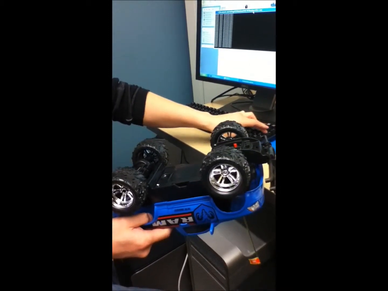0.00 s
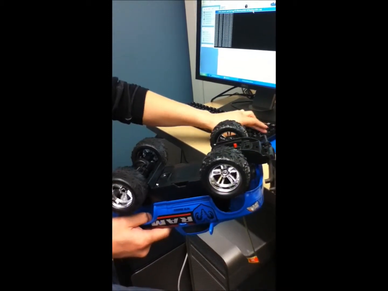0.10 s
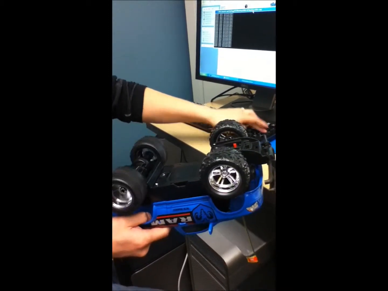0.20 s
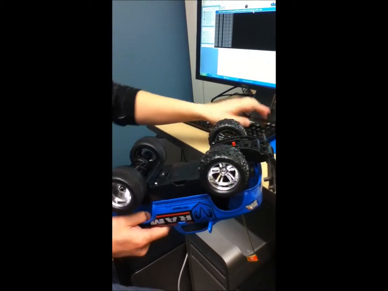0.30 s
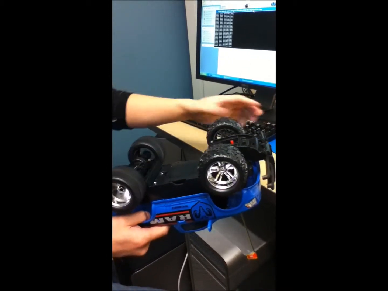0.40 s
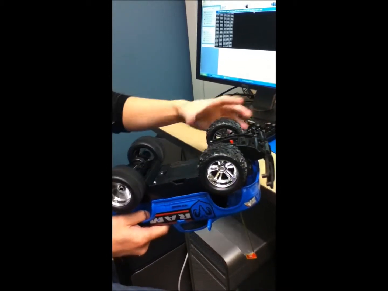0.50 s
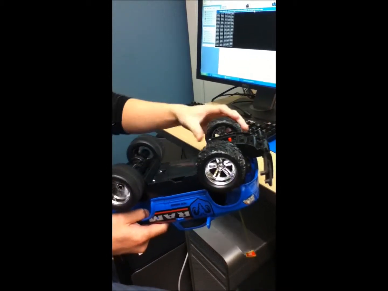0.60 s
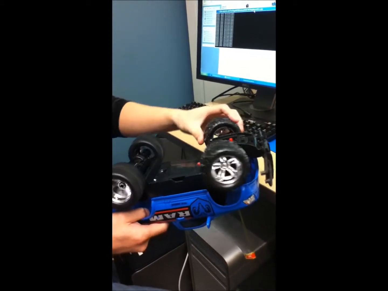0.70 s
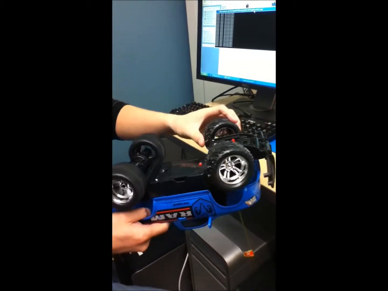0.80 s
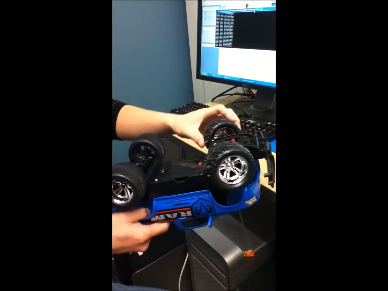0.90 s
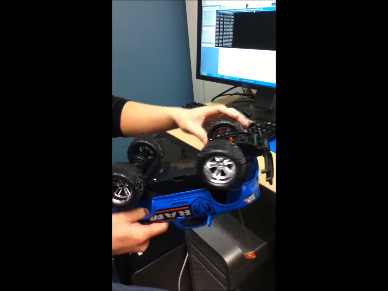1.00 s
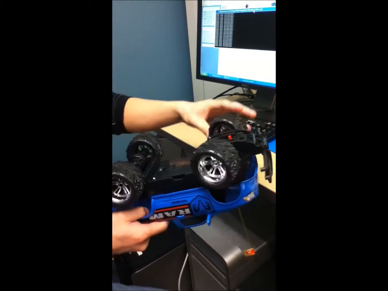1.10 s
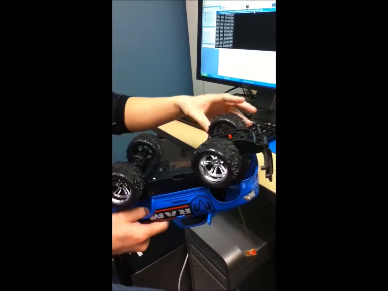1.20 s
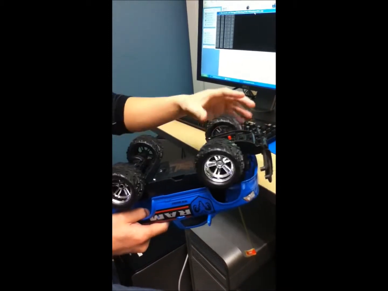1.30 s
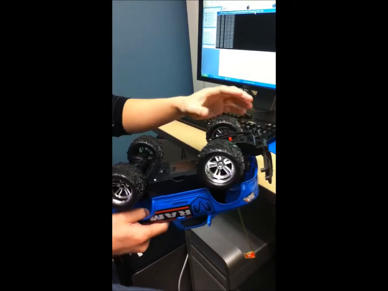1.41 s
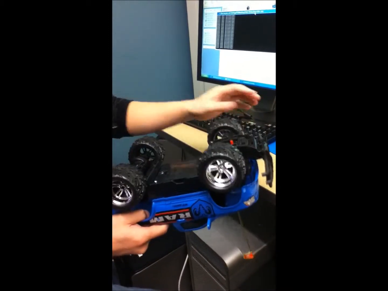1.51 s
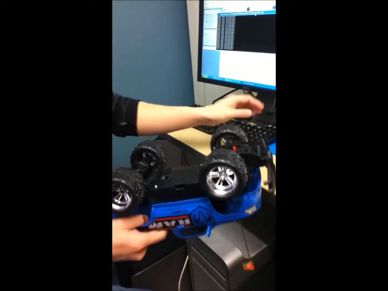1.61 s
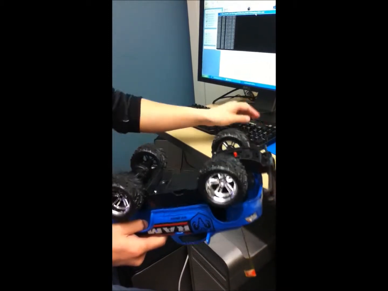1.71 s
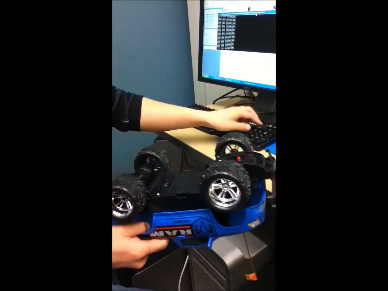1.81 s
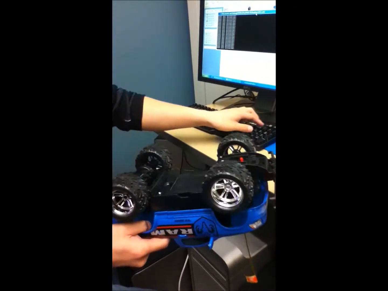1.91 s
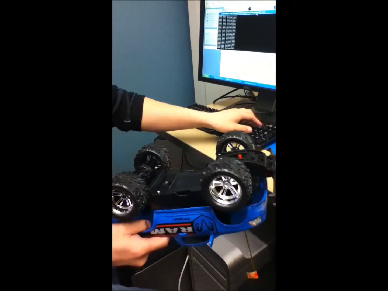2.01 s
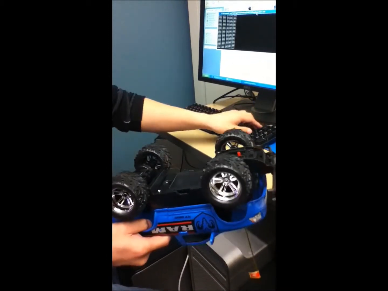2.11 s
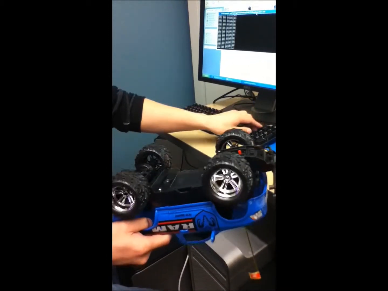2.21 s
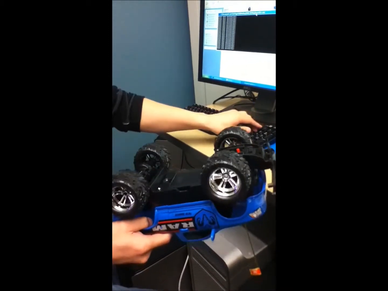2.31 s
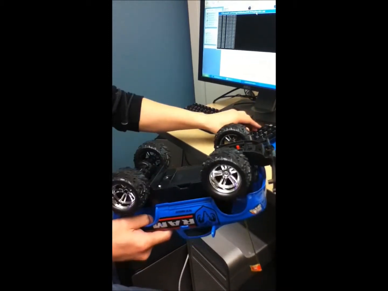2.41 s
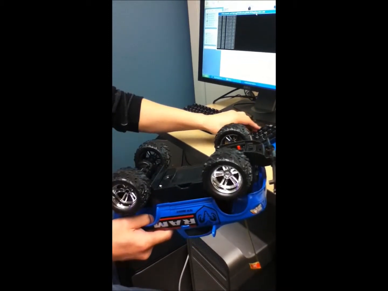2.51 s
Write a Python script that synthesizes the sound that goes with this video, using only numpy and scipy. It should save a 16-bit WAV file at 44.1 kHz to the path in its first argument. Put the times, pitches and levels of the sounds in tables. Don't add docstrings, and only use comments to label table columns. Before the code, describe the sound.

Plastic gears of a hand-flicked toy truck wheel rattle in a fast, bright ratcheting burst, slow to separate ticks, then the axle knocks; a pause and one short click follow, close up in a quiet humming office.

```python
import sys
import numpy as np
from scipy import signal
from scipy.fft import rfft, irfft
from scipy.io import wavfile
from scipy.ndimage import map_coordinates

SR = 44100
rng = np.random.default_rng(int(sys.argv[2]) if len(sys.argv) > 2 else 0)


def makeup_ratio(level_db):
    decades = np.asarray(level_db, float) / 20
    return 10 ** decades


def file_out(sig):
    cols = np.atleast_2d(sig).T
    lim = np.clip(cols, -1, 1)
    pcm = np.round(lim * 32767).astype(np.int16)
    wavfile.write(sys.argv[1], SR, pcm)


N = 114660

PIVOT_HZ = 3324
EDGE_HZ = 1990


def level(x, db=0):
    return x * makeup_ratio(db) / np.sqrt(np.mean(x ** 2))


def ring(x, hz, width):
    return signal.lfilter(*signal.iirpeak(hz, hz / width, fs=SR), x)


def colour(x, points):
    hz, db = np.array(points).T
    f = np.fft.rfftfreq(8192, 1 / SR) + 1
    log_gain = np.interp(np.log(f), np.log(hz), db) * np.log(10) / 20
    cepstrum = irfft(log_gain)
    cepstrum[1:4096] *= 2
    cepstrum[4097:] = 0
    impulse = irfft(np.exp(rfft(cepstrum)))
    return signal.fftconvolve(x, impulse)[:len(x)]


def walk(rate):
    at = np.arange(N) * rate / SR
    return 0.77 * map_coordinates(rng.standard_normal(2000), [at], order=1)


def tilt(bright_db, hz):
    return makeup_ratio(bright_db * np.log2(max(hz, EDGE_HZ) / PIVOT_HZ))


def office():
    # (frequency [Hz], density [dB per Hz])
    rumble = [(12, -25.5), (20, -7), (38, -3), (55, -13.5), (113, -7), (146, -24.5), (210, -13), (558, -35),
              (16000, -46.5)]
    # (frequency [Hz], width [Hz], level [dB])
    fan = [(25.2, 5.5, -41), (109.3, 21, -53), (196, 36, -58), (365, 57, -56.5)]
    # (frequency [Hz], width [Hz], level [dB])
    hiss = (4200, 2500, -62.5)
    out = level(colour(rng.standard_normal(N), rumble), -42)
    for hz, width, db in [*fan, hiss]:
        out = out + level(ring(rng.standard_normal(N), hz, width), db)
    return out


def room(x):
    t60_s, tail_db, dull_hz = 0.22, -16, 5000
    t = np.arange(SR // 2) / SR
    tail = rng.standard_normal(len(t)) * makeup_ratio(-60 * t / t60_s) * (t > .003)
    tail = signal.lfilter(*signal.butter(1, dull_hz, fs=SR), tail)
    return signal.fftconvolve(x, tail * makeup_ratio(tail_db) / np.sqrt(np.sum(tail ** 2)))[:N]


def ticks():
    teeth_per_s, scatter_db, biggest_db, grit_db = 2500, 3.0, 11, -2.5
    gaps, sizes = rng.random((2, 20000))
    at = (np.cumsum(.5 + gaps) * SR / teeth_per_s).astype(int)
    x = np.zeros(at[-1] + N)
    x[at] = makeup_ratio(np.minimum(-scatter_db * np.log(sizes), biggest_db))
    x = x[:N] - x[:N].mean()
    return level(x) + level(rng.standard_normal(N), grit_db)


def body(drive, push, modes, shell_db, wander_db):
    # (frequency [Hz], density [dB per Hz])
    shell_spectrum = [(290, -71.5), (500, -39), (678, -10.5), (1570, -4), (1790, 3), (2500, -5), (3750, 0),
                      (11600, -15.5), (16000, -15.5)]
    wander_per_s, top_hz = 35, 12900
    norm = np.sqrt(sum(makeup_ratio(db) ** 2 * width * np.pi / SR for _, width, db in modes))
    out = np.zeros(N)
    for k, (hz, width, db) in enumerate(modes):
        force = drive * push(hz) * makeup_ratio(wander_db * walk(wander_per_s))
        out += (-1) ** k * makeup_ratio(db) / norm * ring(force, hz, width)

    shell = level(colour(drive, shell_spectrum), shell_db)
    low = signal.lfilter(*signal.butter(1, PIVOT_HZ, fs=SR), shell)
    wide = signal.lfilter(*signal.butter(1, PIVOT_HZ * 2.4, fs=SR), shell)
    out += low * push(PIVOT_HZ / 2)
    out += (wide - low) * push(PIVOT_HZ * 0.91)
    out += (shell - wide) * push(PIVOT_HZ * 3.3)
    return signal.sosfilt(signal.butter(4, top_hz, fs=SR, output="sos"), out)


def axle(t):
    # (start [s], level [dB], brightness [dB per octave], decay [s])
    knocks = [(1.095, -30, -1.5, 0.0032), (1.107, -36, -1, .002), (1.114, -50, -10, 0.0066),
              (1.13, -45, -9, 0.0023), (1.140, -35, -6, 0.0023), (1.147, -41, -10, 0.0042),
              (1.154, -23, 2.5, 0.0011), (1.158, -27, -3.5, 0.0033), (1.167, -39.5, -6.5, 0.0054),
              (1.173, -48, 0, 0.0018), (1.195, -45, 1, 0.0016), (1.199, -39.5, -4.5, 0.0048),
              (1.277, -54, -10, 0.012), (1.333, -40, -5.5, 0.006), (1.344, -37, -1.5, 0.0045),
              (1.373, -42, -2, 0.0017), (1.378, -44, -6, 0.0096), (1.402, -48.5, -5, 0.0036),
              (2.328, -38.5, -8.5, 0.013), (2.371, -49, -9, .03)]
    # (frequency [Hz], width [Hz], level [dB])
    axle_modes = [(820, 280, -3), (1370, 160, 1.5), (1900, 120, -3.5), (2230, 194, -1.5), (3000, 285, -15),
                  (4480, 580, -4.5), (7110, 860, -6), (10600, 3200, -14.5)]
    start, db, bright, decay = np.array(knocks).T
    since = t - start[:, None]
    shape = (since > 0) * np.exp(-np.maximum(since, 0) / decay[:, None])

    def push(hz):
        return 1.35 * makeup_ratio(db) * tilt(bright, hz) @ shape

    return body(ticks(), push, axle_modes, shell_db=-7, wander_db=2.4)


def sings(t):
    # (centre [s], length [s], frequency [Hz], level [dB])
    tones = [(0.246, .045, 1690, -24.5), (0.293, 0.019, 2880, -11), (0.3, 0.038, 2190, -19),
             (0.323, 0.03, 1690, -17), (0.338, 0.015, 3680, -13), (0.347, 0.039, 1830, -15),
             (0.37, 0.018, 2900, -13.5), (0.379, 0.022, 3820, -16), (.410, 0.015, 2150, -17.5),
             (.374, .018, 11870, -26), (0.442, 0.03, 2270, -18), (0.586, 0.018, 2200, -18.5),
             (0.616, 0.023, 2950, -20.5), (.660, 0.059, 1850, -27), (0.708, .03, 1670, -26),
             (0.803, .016, 2240, -25.5)]
    wobble, flutter_db = 0.0053, 3
    centre, length, hz, db = np.array(tones).T[:, :, None]
    swell = np.cos(np.pi * np.clip((t - centre) / length / 1.27, -.5, .5)) ** 2
    clock = np.cumsum(1 + wobble * walk(150.2)) / SR
    waves = np.sin(2 * np.pi * (hz * clock + rng.random((len(hz), 1))))
    return np.sqrt(2) * (makeup_ratio(db) * swell * waves).sum(axis=0) * makeup_ratio(flutter_db * walk(400))


def gears(t):
    # (time [s], level [dB], brightness [dB per octave])
    spin = [(.205, -40, 1.5), (.225, -26.5, -3), (.26, -17.5, -3), (.32, -21, 2.5), (.45, -20, 0.5),
            (.53, -27.5, 2), (.7, -28.5, -3), (.9, -30, -2), (1.0, -47, 0.5), (1.12, -56.5, -6.5),
            (1.24, -63, -1)]
    # (start [s], length [s], level [dB], brightness [dB
    # per octave], favoured frequency [Hz])
    binds = [(0.217, 0.0081, -25, -9, 3800), (0.248, 0.012, -21.5, -2.5, 1720),
             (0.27, 0.014, -21.5, -7, 6400), (.283, 0.02, -13.5, 0, 2870),
             (0.309, 0.023, -18.5, -0.5, 1750), (0.329, 0.02, -14, -1.5, 3970),
             (0.362, 0.018, -11, 0, 4100), (0.396, 0.018, -12, 0, 3800), (0.429, .016, -13.5, 1.5, 2230),
             (0.467, .012, -12, 0, 4200), (0.502, .011, -13.5, 1, 3860), (0.535, 0.012, -14.5, 0.5, 4200),
             (0.556, 0.01, -15.5, 0, 3130), (0.576, 0.014, -17.5, -1.5, 2230),
             (0.594, 0.016, -18.5, 2, 3130), (0.612, 0.012, -19.5, 0.5, 3000),
             (0.637, 0.025, -21, 0.5, 1850), (0.664, 0.0042, -17, 0.5, 1850), (0.678, 0.031, -22, 2, 1700),
             (0.719, 0.011, -23, -1, 2250), (0.74, 0.0053, -20.5, 0.5, 3000),
             (0.753, 0.0057, -18.5, 1, 4750), (0.794, 0.0035, -17.5, 1, 2240), (0.805, 0.013, -27, 0, 3000),
             (0.834, 0.027, -27, -1, 2400), (0.864, 0.0071, -22, 0, 2400), (0.876, 0.01, -29, -1, 2300),
             (0.922, .011, -26.5, -2.5, 1900), (.939, 0.0085, -29, -2.5, 3000),
             (0.964, 0.002, -25.5, -1, 2300),
             (0.191, 0.0036, -24.5, -2, 4890), (1, 0.0049, -30, -2, 2260), (1.02, 0.00292, -39, -4.5, 3000),
             (1.037, .005, -35, -5.5, 1900), (1.063, .006, -38.5, -5.5, 2800),
             (1.074, 0.00325, -38.5, -6, 2900), (2.307, 0.0063, -19, 0, 4940),
             (2.326, 0.0027, -26.5, 2, 2250), (2.344, 0.0046, -25.5, -0.5, 3560),
             (2.364, .001, -23, -1.5, 1850), (2.316, 0.054, -37.5, -2.5, 2260),
             (2.374, 0.023, -55, 3, 2180), (2.424, 0.025, -54, -7, 2260)]
    # (frequency [Hz], width [Hz], level [dB])
    chassis = [(722, 167, -14.5), (1201, 68, -11), (1757, 64, -1.5), (1850, 46.6, 0.5), (2230, 126, -5.5),
               (2870, 376, -1.5), (3870, 93, -9), (4200, 294, -1.5), (4750, 310, -11), (5164, 203, -4),
               (6237, 530, -10), (7660, 167, -7), (9040, 1500, -20.5), (12370, 400, -16.5)]
    rise_s, rise_share, fall_s = 0.002, 0.31, 0.0026
    favour_db, favour_oct = 4, 0.12
    rattle_db, rattle_per_s = 2, 270

    s, spin_db, spin_bright = np.array(spin).T
    free = makeup_ratio(np.interp(t, s, spin_db, left=-120, right=-120))
    free_bright = np.interp(t, s, spin_bright)

    start, length, db, bright, favoured = np.array(binds).T
    since = t - start[:, None]
    rise = np.clip(since / (rise_s + rise_share * length[:, None]), 0, 1) ** 2
    fall = np.exp(-np.maximum(since - length[:, None], 0) / fall_s)
    shape = rise * fall

    def push(hz):
        favour = favour_db * np.exp(-(np.log2(hz / favoured) / favour_oct) ** 2)
        gain = makeup_ratio(db + favour) * tilt(bright, hz)
        return np.sqrt(gain ** 2 @ shape + (free * tilt(free_bright, hz)) ** 2)

    drive = ticks() * makeup_ratio(rattle_db * walk(rattle_per_s))
    return body(drive, push, chassis, shell_db=-1.5, wander_db=2.5)


def scene():
    t = np.arange(N) / SR
    rattle = gears(t)
    lows = signal.sosfiltfilt(signal.butter(10, EDGE_HZ, fs=SR, output="sos"), rattle)
    rattle = rattle - (1 - makeup_ratio(-1.5)) * lows
    truck = rattle + axle(t) + sings(t)
    return (truck + room(truck) + office())[None]


def roll_off(x):
    return signal.sosfilt(signal.butter(12, 16420, fs=SR, output="sos"), x)


def record(dry):
    mic_hz = 15550
    rounded = dry / (1 + dry ** 6) ** (1 / 6)
    heard = .96 * signal.sosfilt(signal.ellip(8, .2, 60, mic_hz, fs=SR, output="sos"), rounded)
    return roll_off(heard)


dry = scene()
out = record(dry)
file_out(out)
```